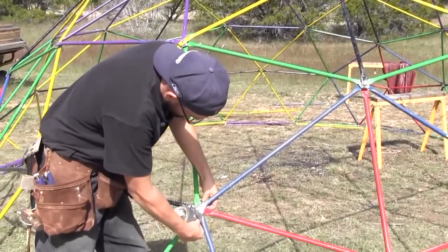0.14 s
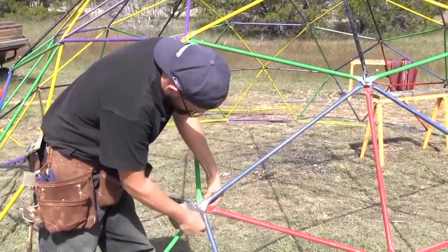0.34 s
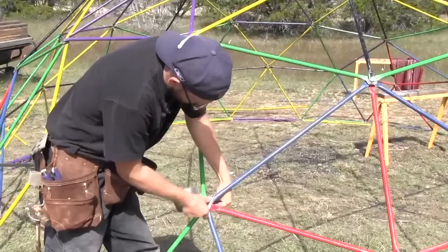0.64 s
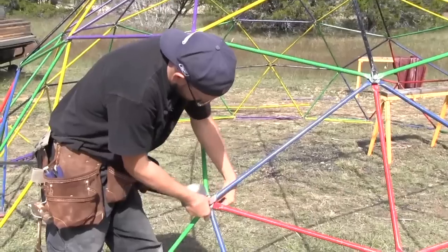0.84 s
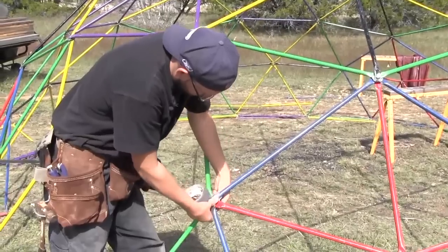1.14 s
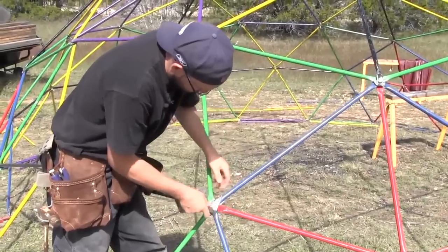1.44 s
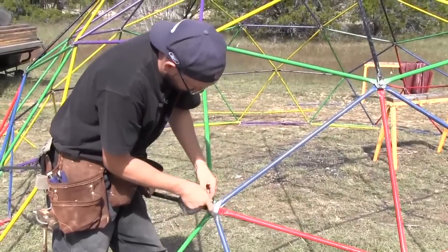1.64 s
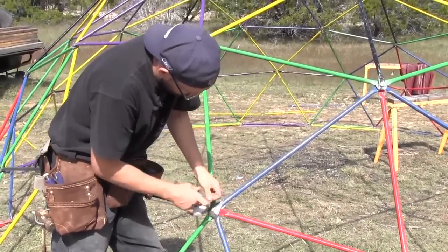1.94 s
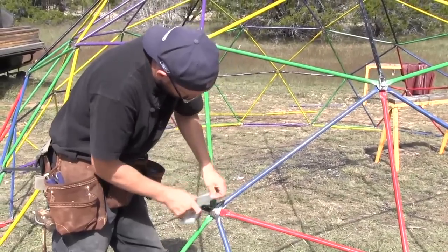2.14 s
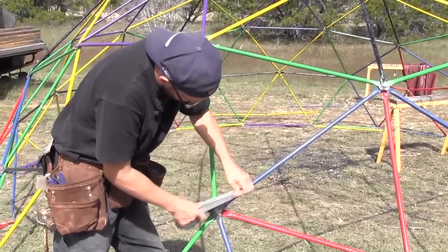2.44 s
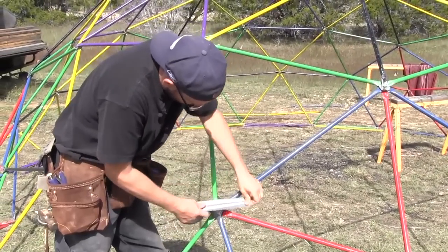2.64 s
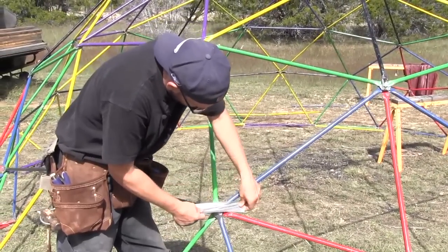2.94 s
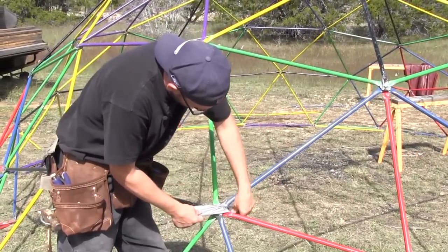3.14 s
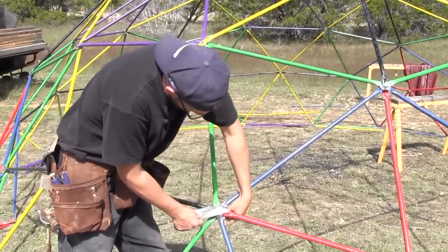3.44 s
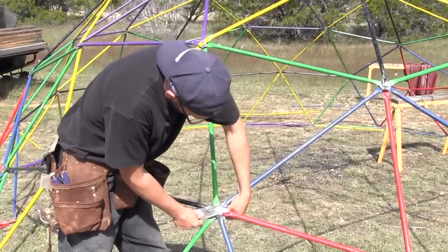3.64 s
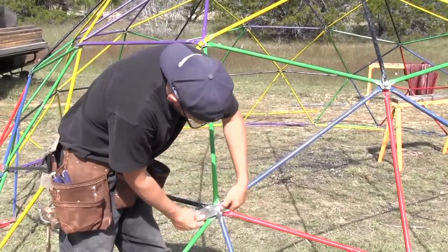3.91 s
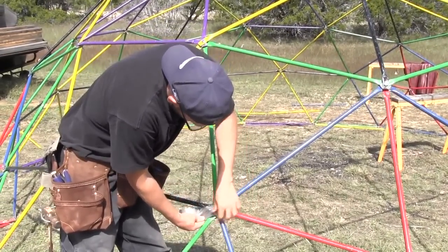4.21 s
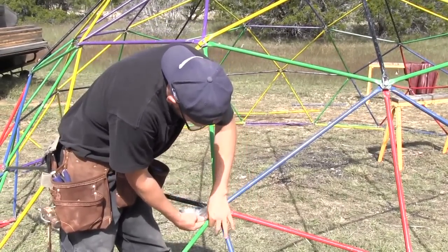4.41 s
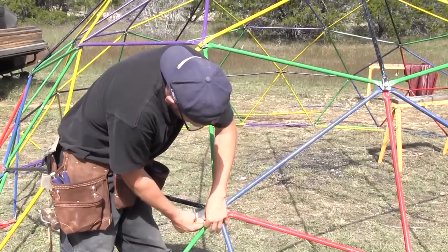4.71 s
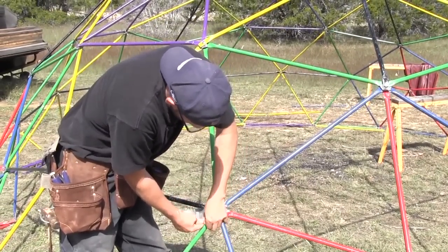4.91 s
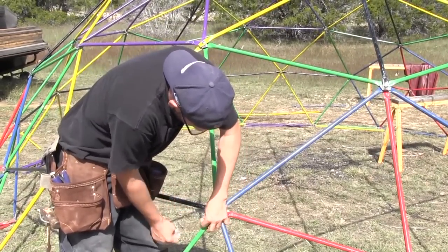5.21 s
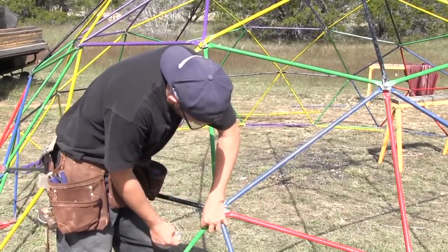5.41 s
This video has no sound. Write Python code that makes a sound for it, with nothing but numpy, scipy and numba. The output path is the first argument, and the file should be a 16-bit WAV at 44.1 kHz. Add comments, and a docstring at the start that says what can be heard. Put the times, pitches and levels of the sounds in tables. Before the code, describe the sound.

Close handling of adhesive tape in an open field. Glue ticks and crisp crinkles with hand rustle come first, then sparser, quieter movement. Just after two seconds come two abrupt, loud rips, then a short stuttering creak, soft rubbing and scattered crinkles, and finally a small snap and tear. A low distant engine hum and light wind lie beneath, dipping after the rips. Dry, centred microphone with faint hiss.

```python
"""Duct tape is wrapped round a joint of metal struts in an open field; a far engine hums under light wind.
First the roll ticks and the backing crinkles under hissing, rustling hands; then the tape rips off the roll
in two pulls, creaks in stick and slip as it is stretched, is rubbed down and torn off.
Snaps, folds and slips are noise clicks shaking resonances; rubbing is filtered noise; the engine is two sines.
An automatic gain control ducks at each rip and creeps back."""
import sys
import numpy as np
from scipy import signal
from scipy.fft import rfft, irfft
from scipy.io import wavfile
from scipy.ndimage import uniform_filter1d
from numba import njit

SR = 44100
rng = np.random.default_rng(int(sys.argv[2]) if len(sys.argv) > 2 else 0)


def pcm_store(signal):
    """Save signal as 16-bit PCM."""
    levels = np.round(np.clip(np.atleast_2d(signal), -1, 1) * 32767)
    wavfile.write(sys.argv[1], SR, levels.astype(np.int16).T)


N = 245195
T = np.arange(N) / SR  # s

# colour of the plastic backing when struck: (frequency [Hz], level [dB])
BACKING_COLOUR = [(120, -6), (600, -3), (1500, -5), (4000, -3), (9000, -7), (16000, -13)]


def undb(db):
    """Decibels to amplitude factor."""
    return 10 ** (np.asarray(db) / 20)


def unit(x):
    """Scale to rms 1."""
    return x / np.sqrt(np.mean(x ** 2) + 1e-18)


def peak(x, db):
    """Scale to a peak level."""
    return x * undb(db) / np.abs(x).max()


def curves(rows):
    """The columns of a table joined by straight lines in time."""
    s, *columns = np.transpose(rows)
    return [np.interp(T, s, c) for c in columns]


def add(out, s, x):
    """Mix a sound in at time s."""
    i = max(int(s * SR), 0)
    out[i:i + len(x)] += x[:max(N - i, 0)]


def colour(x, points, size=2048):
    """Minimum-phase filter through (Hz, dB) points, by folding the cepstrum."""
    hz, db = np.transpose(points)
    bin_hz = np.maximum(np.arange(size // 2 + 1) * SR / size, 1)
    shape_db = np.interp(np.log(bin_hz), np.log(hz), db)
    cepstrum = irfft(np.log(undb(shape_db)))
    cepstrum[1:size // 2] *= 2
    cepstrum[size // 2 + 1:] = 0
    impulse_response = irfft(np.exp(rfft(cepstrum)))
    return signal.fftconvolve(x, impulse_response)[:len(x)]


@njit
def resonate(x, hz, q):
    """State-variable band-pass with a moving centre, gain 1 there."""
    y, band, low = np.empty(len(x)), 0., 0.
    for i in range(len(x)):
        g = np.tan(np.pi * min(hz[i] / SR, .45))
        v = (band + g * (x[i] + 1e-18 - low)) / (1 + g * (g + 1 / q))
        band = 2 * v - band
        low += 2 * g * v
        y[i] = v / q
    return y


def resonate_fixed(x, hz, q):
    """The same band-pass with a fixed centre."""
    return resonate(x, np.full(len(x), float(hz)), float(q))


def walk(rate_hz):
    """Smooth random curve of rms 1, changing about rate_hz times a second."""
    k = max(int(SR / rate_hz), 1)
    steps = np.repeat(rng.standard_normal(N // k + 1), k)
    return unit(uniform_filter1d(uniform_filter1d(steps, k), k)[:N])


def click(t60_s, tail_db, size=4096):
    """A sharp snap followed by a dying fizz."""
    fizz_db = tail_db - 60 * np.arange(size) / SR / max(t60_s, .001)
    x = undb(fizz_db) * rng.standard_normal(size)
    x[0] += 1
    return x


def field(wind_db=-63, gust_db=2.2, second_db=-20, waver_db=1.1):
    """A far engine's exhaust note, fundamental and second harmonic, over gusty low wind noise."""
    engine_course = [(0, 111, -68.5), (.5, 112, -66), (1.1, 109, -70), (1.8, 107, -67), (2.15, 107, -67),
                     (3.7, 108, -61.5), (4.5, 106, -61), (4.85, 106.5, -58), (5.56, 105.5, -59.5)]  # (time [s], fundamental [Hz], level [dB])
    wind_colour = [(20, -3), (35, -0.5), (65, 0), (100, -7), (170, -13), (300, -19), (800, -25),
                   (1500, -34), (8000, -43)]  # (frequency [Hz], level [dB])
    hz, db = curves(engine_course)
    phase = 2 * np.pi * np.cumsum(hz * (1 + .004 * walk(9))) / SR
    note = np.sqrt(2) * (np.sin(phase) + undb(second_db) * np.sin(2 * phase))
    engine = note * undb(db + waver_db * walk(8))
    wind = unit(colour(rng.standard_normal(N), wind_colour))
    return engine + wind * undb(wind_db + gust_db * walk(9))


def jolts():
    """Hands and roll thump softly on the frame: low sines that die quickly."""
    thumps = [(1.035, -54, 230, .1), (2.182, -47, 160, .06), (2.246, -41, 120, .06), (2.318, -39, 75, .2),
              (2.67, -51, 30, .25), (5.15, -46, 45, .15)]  # (time [s], level [dB], frequency [Hz], ring-out to -60 dB [s])
    out = np.zeros(N)
    for s, db, hz, t60_s in thumps:
        after_s = T - s
        out += np.sin(2 * np.pi * hz * np.maximum(after_s, 0)) * undb(db - 60 * np.abs(after_s) / t60_s)
    return out


def friction(points, grain_db, flutter_db):
    """Countless tiny catches of uneven size, coming in flurries."""
    grains = rng.standard_normal(N) * undb(grain_db * walk(1500) + flutter_db * walk(60))
    return unit(colour(grains, points))


def hand_stroke(x, s, length_s, db):
    """The stretch of x under one hand movement, swelling and fading: start time and sound."""
    start = max(s - 1.5 * length_s, 0)
    part = slice(int(start * SR), int((s + 1.5 * length_s) * SR) + 2)
    return start, unit(x[part]) * undb(db - 17 * ((T[part] - s) / length_s) ** 2)


def hands(hiss_db, rustle_db, light_hiss_db=-4, light_rustle_db=-3, unsteady_db=1.5,
          scuff_db=-3, scrape_db=6, scrape_q=2.5):
    """Fingers hiss on the backing, lightly and in firm slides; dragged tape scrapes in a broad resonance."""
    hiss_colour = [(300, -30), (1300, -17), (3000, -8), (4100, 0), (5200, -3), (7300, -1), (13500, -9),
                   (16000, -22)]  # (frequency [Hz], level [dB])
    rustle_colour = [(60, -8), (220, 0), (450, -3), (850, -2), (1250, -9), (2400, -12), (5000, -28),
                     (12000, -33)]  # (frequency [Hz], level [dB])
    slides = [(.342, .016, -51), (.54, .05, -62), (.71, .07, -72), (.845, .04, -67), (.98, .06, -72),
              (1.13, .06, -70), (1.405, .04, -61), (2.085, .13, -61.5), (2.225, .04, -58), (2.43, .14, -69),
              (2.66, .06, -56), (3.9, .14, -66), (4.33, .075, -59), (4.5, .045, -67), (4.71, .07, -65),
              (5.165, .018, -58)]  # fingers along the tape: (middle [s], length [s], level [dB])
    # tape dragged over the joint: (middle [s], length [s], level before scuff_db [dB], scrape [Hz])
    scuffs = [(.05, .1, -64, 1500), (.29, .14, -64, 260), (1.36, .15, -70, 250), (3.24, .06, -56, 620),
              (3.53, .16, -66, 260), (4.705, .06, -65, 800), (5.218, .025, -57, 850)]
    hiss = friction(hiss_colour, grain_db=3.5, flutter_db=1.8)
    rustle = friction(rustle_colour, grain_db=3.5, flutter_db=2.2)
    light = hiss * undb(hiss_db + light_hiss_db) + rustle * undb(rustle_db + light_rustle_db)
    out = light * undb(unsteady_db * walk(14))
    for s, length_s, db in slides:
        add(out, *hand_stroke(hiss, s, length_s, db))
    for s, length_s, db, hz in scuffs:
        start, x = hand_stroke(rustle, s, length_s, db + scuff_db)
        add(out, start, x + undb(scrape_db) * resonate_fixed(x, hz, scrape_q))
    return out


def fold(hz, db, t60_s=.011, fold_db=6, q=1.6):
    """One fold of the plastic backing buckles: a click through a broad resonance of its own."""
    x = click(t60_s, tail_db=-9.5)
    x = x + undb(fold_db) * resonate_fixed(x, hz, q)
    return peak(colour(x, BACKING_COLOUR), db)


def crinkles(hiss_db, small_per_s=13, small_hz=5500, small_over_hiss_db=21.5, spread_db=3, spread_octaves=.4):
    """Large folds buckle at set times; small ones fall by chance and grow with the level of the hands."""
    large_folds = [(.135, -34, 6000), (.314, -34, 7000), (.337, -28, 7000), (.3735, -34.5, 6500),
                   (.380, -37, 6000), (.4045, -36, 4500), (.4575, -30, 4000), (.5245, -37.5, 6000),
                   (.6425, -44, 6000), (.905, -44, 6000), (1.066, -40, 6000), (1.084, -39, 4500),
                   (1.3815, -33.5, 4800), (2.163, -34, 7000), (2.180, -26, 7500), (2.1875, -36, 7000),
                   (2.2138, -28.5, 3000), (2.2393, -27, 4000), (2.2452, -23, 2000), (3.4255, -40, 4000),
                   (3.5075, -38.5, 5000), (3.588, -39, 8000), (3.6095, -33.5, 6000), (3.8435, -36.5, 3500),
                   (4.0045, -39, 4500), (4.2155, -36, 7000), (4.3635, -38, 4500), (4.6755, -36.5, 6000),
                   (4.730, -37.5, 5500), (5.085, -46, 2500), (5.099, -40, 2500), (5.3603, -35, 7000)]  # (time [s], level [dB], resonance [Hz])
    out = np.zeros(N)
    for s, db, hz in large_folds:
        add(out, s, fold(hz, db))
    for i in np.flatnonzero(rng.random(N) < small_per_s / SR):
        pitch, size = np.tanh(rng.standard_normal(2))
        hz = small_hz * 2 ** (spread_octaves * pitch)
        add(out, T[i], fold(hz, hiss_db[i] + small_over_hiss_db + spread_db * size))
    return out


def slip(db, sharp_db, edge_db=-15):
    """One jump of the stretched tape, which answers like a small drumskin."""
    skin_modes = [(520, 170, 11), (820, 260, 4), (1300, 400, -17), (2300, 800, -17)]  # (frequency [Hz], width [Hz], level [dB])
    x = click(t60_s=.015, tail_db=-20.5)
    skin = sum(undb(mode_db) * resonate_fixed(x, hz, hz / width_hz) for hz, width_hz, mode_db in skin_modes)
    edge = colour(x, BACKING_COLOUR)
    return peak(skin + undb(edge_db + sharp_db) * edge, db)


def creaks(start_s=3.1915, length_s=.09, middle_db=-34.5, end_db=-7, scatter_db=2.5,
           gap_s=.0052, gap_growth=1.05, jitter=.3, sharp_db=-10, sharp_scatter_db=8, count=13):
    """Single plucks of the taut tape, and a run of stick and slip that swells, slows and dies away."""
    plucks = [(1.8085, -42, -30), (2.644, -27, -20), (5.015, -48, -10), (5.033, -24, 6), (5.145, -21, 3)]  # (time [s], level [dB], sharp edge [dB])
    out = np.zeros(N)
    for s, db, pluck_sharp_db in plucks:
        add(out, s, slip(db, pluck_sharp_db))
    after_s = 0
    for k, (gap, size, edge) in enumerate(rng.standard_normal((count, 3))):
        db = middle_db + end_db * (2 * after_s / length_s - 1) ** 2  # end_db: at both ends, against midway
        add(out, start_s + after_s, slip(db + scatter_db * size, sharp_db + sharp_scatter_db * edge))
        after_s += gap_s * gap_growth ** k * np.exp(jitter * gap)
    return out


def ticks(gain_db=1.3, latest_s=.012, neighbour_db=-9):
    """Single spots of glue let go as the roll is worked round the joint; each takes a weaker neighbour along."""
    glue_spots = [(0.0438, -34), (0.0702, -35), (0.1386, -31), (0.155, -33), (0.165, -32), (0.193, -30),
                  (0.1964, -28), (0.2199, -30), (0.2468, -28), (0.2554, -31), (0.2634, -34), (0.2798, -32),
                  (0.3122, -33), (0.3284, -34)]  # (time [s], level before gain_db [dB])
    tick_colour = [(150, -28), (600, -13), (1300, -7), (1700, -8), (2650, 0), (3200, -5), (4000, -23),
                   (10000, -23), (16000, -32)]  # (frequency [Hz], level [dB])
    out = np.zeros(N)
    for s, db in glue_spots:
        for delay_s, size_db in [(0, 0), (latest_s * rng.random(), neighbour_db)]:
            x = colour(click(t60_s=.01, tail_db=-16), tick_colour)
            add(out, s + delay_s, peak(x, db + gain_db + size_db))
    return out


def snaps(length_s, rate_hz, jitter, scatter_db, fizz_db, tail_db, t60_s, count=256, size=6144):
    """Rows of glue threads snap in uneven steps, over the fizz of the finest ones, which dies after the stop."""
    gaps, sizes, sides = rng.standard_normal((3, count))
    at_s = np.cumsum(np.exp(jitter * gaps)) / rate_hz
    at_s -= at_s[0]
    kicks = np.sign(sides) * undb(scatter_db * np.tanh(sizes)) * (at_s < length_s)
    x = np.zeros(size)
    np.add.at(x, np.minimum(at_s * SR, size - 1).astype(int), kicks)
    after_s = np.arange(size) / SR - length_s
    fade_db = np.where(after_s < 0, 0, tail_db - 60 * np.abs(after_s) / t60_s)
    fizz = rng.standard_normal(size) * undb(fade_db)
    return unit(x) + undb(fizz_db) * unit(fizz)


def rips(ring_db=-1):
    """Pulls swell and fade; snaps shake the free strip, whose pitch is inverse to its growing length."""
    stroke_colours = {"short": [(25, -5), (170, -11), (560, -1), (1100, -7), (1600, -1), (2150, -10),
                      (3800, -2), (5300, -9), (11500, -9.5), (16000, -22)], "jerk": [(30, -13), (150, -12),
                      (350, -4), (680, -5), (1050, -3), (2000, -10), (3000, -8), (4800, -14),
                      (12000, -22.5), (16000, -28)], "long": [(30, -12), (120, -5), (350, -3), (750, -3),
                      (1300, -4), (2400, -10), (4000, -4), (5200, -9), (11500, -9), (16000, -18)],
                      "tear": [(50, -7), (250, -8), (720, -3), (1250, -7), (2400, -3), (3500, -14),
                      (4400, -8), (11000, -9.5), (16000, -21)]}  # per stroke: (frequency [Hz], level [dB])
    strip_modes = [(1, 6, 6), (2.8, 9, 4), (4.9, 13, 0)]  # (multiple of the strip's pitch, Q, level [dB])
    # (stroke, start [s], length [s], crest after [s], crest level [dB], swell before it [dB],
    #  fade after it [dB], snap rate [Hz], strip pitch at start [Hz], at end [Hz])
    pulls = [("short", 2.2645, .036, .019, -27.5, 9, 1.5, 2500, 3000, 690),
             ("short", 2.3005, .033, .020, -15.7, 9, 9, 2600, 640, 600),
             ("jerk", 2.530, .009, .007, -26.5, 5, 1, 1500, 470, 450),
             ("jerk", 2.549, .010, .006, -21, 3, 2, 1500, 400, 380),
             ("jerk", 2.565, .007, .002, -19, 1, 2, 1500, 380, 360),
             ("long", 2.577, .062, .046, -17.5, 5, 2.5, 1100, 880, 780),
             ("tear", 5.106, .051, .027, -30, 17, 2, 700, 950, 820)]
    out = np.zeros(N)
    for stroke, s, length_s, crest_s, db, swell_db, fade_db, rate_hz, start_hz, end_hz in pulls:
        force = snaps(length_s, rate_hz, jitter=.4, scatter_db=4, fizz_db=-1, tail_db=-11, t60_s=.035)
        progress = np.minimum(np.arange(len(force)) / SR / length_s, 1)
        hz = 1 / ((1 - progress) / start_hz + progress / end_hz)
        ring = sum(undb(mode_db) * resonate(force, hz * multiple, float(q))
                   for multiple, q, mode_db in strip_modes)
        sound = colour(force + undb(ring_db) * ring, stroke_colours[stroke])
        sound *= np.sqrt(length_s * SR / np.sum(sound ** 2))  # rms 1 over the pull's length
        effort_db = np.interp(progress, [0, min(crest_s / length_s, 1), 1], [-swell_db, 0, -fade_db])
        add(out, s, sound * undb(db + effort_db))
    return out


def outdoors(x, scatter_db=-27, t60_s=.1, size=12000):
    """Body, struts and grass throw back a brief, faint scatter: convolution with decaying noise."""
    t = np.arange(size) / SR
    echo = rng.standard_normal(size) * undb(-60 * t / t60_s) * (t > .003)
    echo /= np.sqrt(np.sum(echo ** 2))
    return x + undb(scatter_db) * signal.fftconvolve(x, echo)[:N]


def scene(rip_db=-.8):
    """Everything reaches one microphone, alike in both channels."""
    # how busy the hands are, before and after the pulls: (time [s], hiss level [dB], rustle level [dB])
    hands_before = [(0.0, -65, -57), (0.19, -64, -58), (0.34, -63, -64), (0.67, -77, -75), (1.33, -77, -72),
                    (1.65, -80, -73), (2.0, -76, -72)]
    hands_after = [(3.1, -83, -82), (3.2, -83, -81), (3.36, -76, -68), (3.768, -75, -74), (3.98, -70, -72),
                   (4.174, -70, -71), (4.788, -81, -75), (5.1, -80, -74)]
    hiss_db, rustle_db = curves([*hands_before, *hands_after])
    background = field() + jolts() + hands(hiss_db, rustle_db)
    tape = undb(rip_db) * rips() + ticks() + creaks() + crinkles(hiss_db)
    mono = background + outdoors(tape)
    return np.array([mono, mono])


@njit
def gain_control(x, limit, attack, release):
    """Output above the limit pushes the gain down; it climbs back at release dB a second."""
    y, cut_db = np.empty(len(x)), 0.
    for i in range(len(x)):
        y[i] = x[i] * 10 ** (-cut_db / 20)
        excess = max(abs(y[i]) - limit, 0.)
        cut_db = max(cut_db + (attack * excess - release) / SR, 0.)
    return y


def record(dry, limit_db=-40, attack=4200., release=14., hiss_db=-86, channel_hiss_db=-90):
    """Automatic gain, then hiss (part shared, part apart in each channel) and a steep low-pass."""
    # attack: dB/s per unit of excess amplitude; release: dB/s
    y = gain_control(dry[0], float(undb(limit_db)), float(attack), float(release))
    shared_hiss = undb(hiss_db) * rng.standard_normal(N)
    channel_hiss = undb(channel_hiss_db) * rng.standard_normal((2, N))
    low_pass = signal.ellip(10, .2, 70, 15900, fs=SR, output="sos")
    return signal.sosfilt(low_pass, y + shared_hiss + channel_hiss)


dry = scene()
out = record(dry)
pcm_store(out)
```